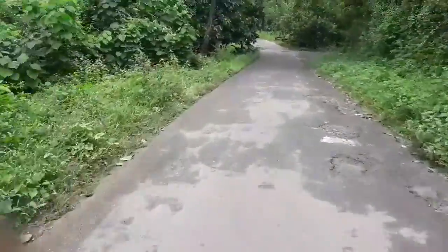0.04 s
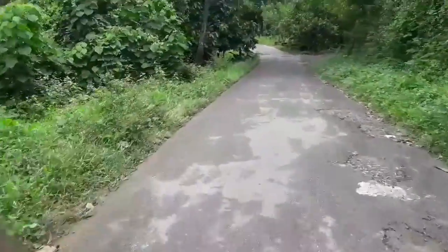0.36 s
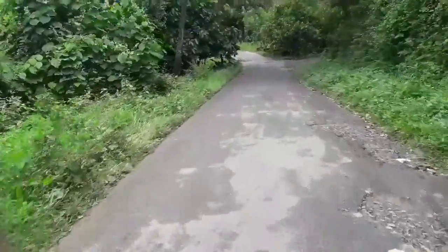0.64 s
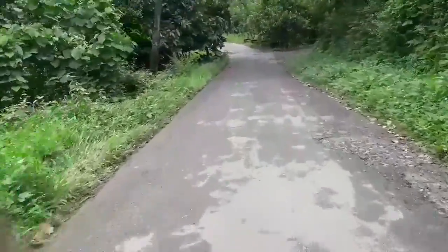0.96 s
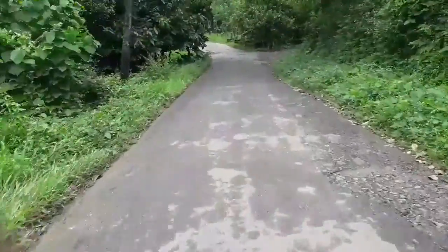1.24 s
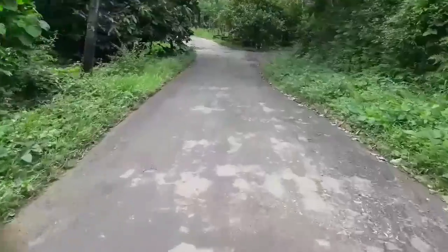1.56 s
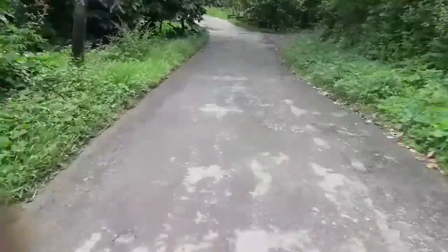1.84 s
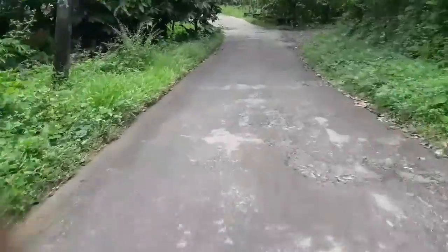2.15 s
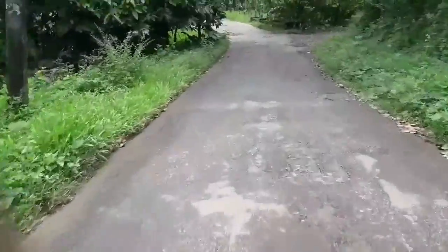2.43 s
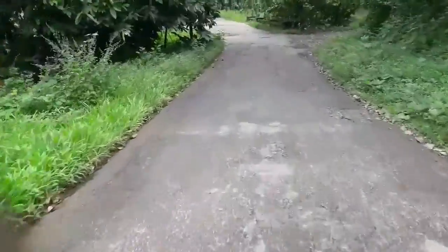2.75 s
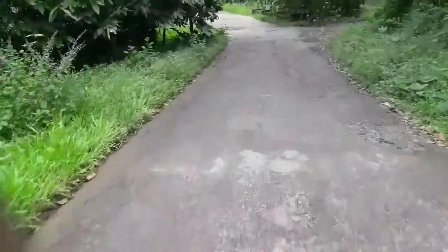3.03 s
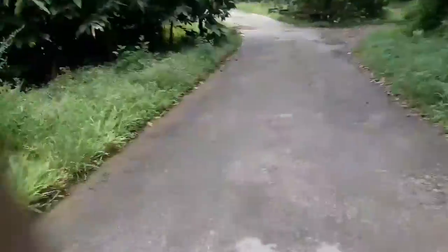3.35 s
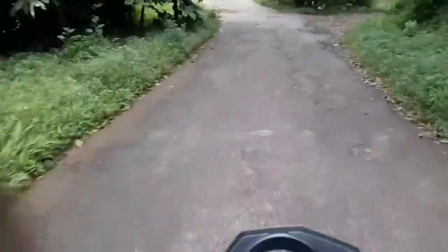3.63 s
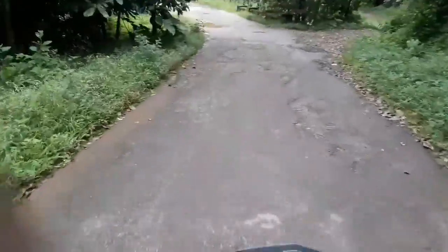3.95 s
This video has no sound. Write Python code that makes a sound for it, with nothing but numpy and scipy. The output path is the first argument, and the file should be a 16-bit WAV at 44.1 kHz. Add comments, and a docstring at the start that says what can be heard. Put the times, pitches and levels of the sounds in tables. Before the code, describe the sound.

A motorcycle putters steadily at low revs, close to a microphone riding with it, while a louder, wavering brake squeal keeps coming and going. Tyres rush softly on the country road until a rough patch brings rattles and one knock.

```python
"""Motorcycle on a country road, from the saddle.

A small microphone rides along on a single-cylinder machine at low revs. Close by, each firing rings
the exhaust pipe, about twelve thumps a second, over clacking valve gear and tyre noise. A dragging
brake squeals on and off. Near the end a rough patch makes the bodywork rattle and knock."""
import sys
import numpy as np
from scipy import signal
from scipy.fft import rfft, irfft
from scipy.io import wavfile
from scipy.ndimage import uniform_filter1d, map_coordinates

SR = 44100
rng = np.random.default_rng(int(sys.argv[2]) if len(sys.argv) > 2 else 0)


def bounce(signal):
    """Save signal as a 16-bit WAV file at the path given by the first command-line argument."""
    frames = np.transpose(np.atleast_2d(signal))
    limited = np.clip(frames, -1, 1)
    pcm = np.round(limited * 32767).astype(np.int16)
    wavfile.write(sys.argv[1], SR, pcm)


N = 176400

# Engine speed: t/s, firing rate/Hz
FIRING_RATE = [(0, 12.64), (.6, 12.114), (.9, 12.815), (1.2, 12.21), (1.5, 13.179), (1.8, 12.939),
               (2.5, 12.436), (3.2, 12.146), (4, 11.652)]


def amp(db):
    """Decibels to gain."""
    return 10 ** (np.asarray(db) / 20)


def unit(x):
    """Scales to rms 1."""
    return x / np.sqrt(np.mean(abs(x) ** 2) + 1e-20)


def curve(rows):
    """Joins (t/s, value) points with straight lines, at every sample."""
    times, values = np.transpose(rows)
    return np.interp(np.arange(N) / SR, times, values)


def add(mix, start_s, sound):
    """Mixes a sound in at the given time."""
    part = mix[max(round(start_s * SR), 0):][:len(sound)]
    part += sound[:len(part)]


def coloured(spectrum):
    """Noise of rms 1, shaped by (f/Hz, level/dB) points of spectral density."""
    hz, db = np.transpose(spectrum)
    gain = amp(np.interp(np.log(np.fft.rfftfreq(N, 1 / SR) + 1), np.log(hz), db))
    return unit(irfft(rfft(rng.standard_normal(N)) * gain, N))


def drift(rate_hz):
    """Random motion of rms 1, up to about the given rate."""
    hz = np.fft.rfftfreq(N, 1 / SR)
    return unit(irfft(rfft(rng.standard_normal(N)) / (1 + (hz / rate_hz) ** 4), N))


def noise_band(phase, width_hz):
    """A narrow band of noise that follows the phase of a tone."""
    return unit(drift(width_hz / 2) * np.cos(phase) + drift(width_hz / 2) * np.sin(phase))


def engine_cycles(first_firing_s=0.01116):
    """Number of engine cycles since the first firing."""
    return np.cumsum(curve(FIRING_RATE)) / SR - first_firing_s * FIRING_RATE[0][1]


def exhaust(rms_db=-40.5, rise_s=0.014, spread_db=0.5, detune=0.0086):
    """Each firing rings the low modes of the pipe, never quite alike; a few burn weakly."""
    # Pipe modes: f/Hz, relative level/dB, t60/s
    pipe_modes = [(66.6, -14.5, 0.083), (98, -9, 0.047), (118.5, 6.5, 0.083), (224, -11, 0.063),
                  (331.6, -2.5, 0.058)]
    # Weak burns: t/s, level change/dB
    weak_burns = [(.25, -6), (.82, -7), (2.39, -15), (2.55, -6), (2.79, -5), (2.88, -4.5)]
    out, t = np.zeros(N), np.arange(SR // 5) / SR
    firing_times = np.flatnonzero(np.diff(np.floor(engine_cycles()))) / SR
    for start in firing_times:
        *mode_shifts, softness = rng.standard_normal(len(pipe_modes) + 1)
        weak_db = sum(db for at, db in weak_burns if abs(at - start) < .04)
        ring = sum(amp(db - 60 * t / t60) * np.sin(2 * np.pi * hz * (1 + detune * shift) * t)
                   for (hz, db, t60), shift in zip(pipe_modes, mode_shifts))
        attack = 1 - np.exp(-t / rise_s)
        add(out, start, -ring * attack * amp(weak_db - spread_db * softness))
    return amp(rms_db) * unit(out)


def valve_gear(rise_s=0.004, t60_s=0.099):
    """Below the saddle the valve gear clacks twice a cycle, once softly and once hard."""
    # Clacks: position/share of the cycle, level/dB
    clacks = [(.27, -44), (.79, -38)]
    # Clack spectrum: f/Hz, relative level/dB
    clack_spectrum = [(300, -17), (700, -4), (950, -8), (1200, 2.5), (1700, -13), (2500, -29.5),
                      (8000, -46)]
    envelope = np.zeros(N)
    for share, db in clacks:
        age_s = (engine_cycles() - share) % 1 / curve(FIRING_RATE)
        envelope += np.minimum(age_s / rise_s, 1) * amp(db - 60 * age_s / t60_s)
    return envelope * coloured(clack_spectrum)


def road_wash(patch_db=1.18):
    """Patchy tyre, air and engine noise around the rider, louder on the rough stretch."""
    # Wash spectrum: f/Hz, relative level/dB
    wash_spectrum = [(20, -37), (45, -17), (80, -1), (130, -5.5), (175, -5), (230, 0.5), (320, 0.5),
                     (500, -7), (730, -5), (1150, -7.5), (1700, -17), (2400, -20), (4000, -23.5),
                     (7200, -27.5), (7700, -35.5), (15500, -42.5)]
    # Wash along the road: t/s, level/dB
    wash_level = [(0, -40), (1, -39), (2.9, -38.5), (3.2, -36), (3.45, -37.5), (4, -38)]
    cells = signal.stft(coloured(wash_spectrum), nperseg=512)[2]
    patches = uniform_filter1d(rng.standard_normal(cells.shape), size=7, axis=0)  # across frequency
    patches = unit(uniform_filter1d(patches, size=3, axis=1))  # across time
    wash = signal.istft(cells * amp(patch_db * patches), nperseg=512)[1][:N]
    return amp(curve(wash_level)) * unit(wash)


def brake_squeal(wobble_hz=22.8, flutter_db=2.76, mid_db=-20, brighten_db_per_hz=0.0349, scrape_db=-26.5):
    """A dragging pad sings a wavering tone, purest when loudest, with rasp, overtones and dry scraping."""
    # Squeal pitch: t/s, f/Hz
    squeal_pitch = [(0, 2702), (.15, 2805), (.2, 2640), (.35, 2755), (.44, 2716), (.53, 2840), (.7, 2715),
                    (.74, 2784), (.85, 2752), (.89, 2910), (.94, 2728), (1.08, 2760), (1.15, 2963),
                    (1.24, 2792), (1.32, 2820), (1.45, 2667), (1.54, 2972), (1.6, 2903), (1.67, 3043),
                    (1.695, 3010), (1.71, 2775), (1.75, 2885), (1.94, 2846), (2.04, 3020), (2.13, 2966),
                    (2.33, 2950), (2.58, 2894), (2.66, 3037), (2.75, 2894), (2.85, 2978), (2.89, 2904),
                    (3.0, 3160), (3.05, 2967), (3.24, 2847), (3.3, 2946), (3.46, 3035), (3.62, 3090),
                    (3.68, 2960), (3.74, 3110), (3.8, 3120), (3.83, 3070), (3.89, 3146), (4, 3180)]
    # Squeal swells, in five consecutive stretches: t/s, level/dB
    squeal_swells = [
        [(0.0, -45), (0.02, -64), (0.058, -28.5), (0.112, -42.5), (0.118, -54), (0.158, -54), (0.168, -37.5),
         (0.186, -38.5), (0.208, -53), (0.326, -67), (0.358, -28), (0.382, -47), (0.41, -46), (0.424, -32),
         (0.448, -24), (0.482, -29), (0.51, -39), (0.544, -24.5), (0.61, -26.5), (0.62, -40.5), (0.652, -30.5),
         (0.692, -32.5), (0.722, -46), (0.732, -29), (0.76, -46), (0.77, -34.5), (0.832, -24), (0.878, -32.5),
         (0.954, -29), (0.964, -44), (1.0, -29), (1.022, -41), (1.032, -32), (1.066, -32), (1.1, -51),
         (1.12, -46)],
        [(1.12, -59), (1.13, -59), (1.168, -22), (1.172, -19.5), (1.204, -40), (1.244, -38), (1.262, -62),
         (1.276, -41), (1.296, -62), (1.324, -27), (1.41, -40), (1.43, -30.5), (1.454, -36), (1.468, -27.5),
         (1.512, -25.5), (1.558, -21), (1.576, -26), (1.592, -24.5), (1.606, -18), (1.616, -25), (1.64, -20),
         (1.65, -27.5), (1.66, -24.5), (1.682, -31.5), (1.702, -34), (1.71, -24.5), (1.77, -32.5),
         (1.786, -25.5), (1.798, -27), (1.824, -21), (1.838, -35), (1.856, -31.5), (1.92, -39.5), (1.93, -35),
         (1.94, -45), (1.96, -44)],
        [(1.96, -33.5), (1.992, -35.5), (2.008, -25), (2.034, -33), (2.044, -22.5), (2.064, -32), (2.078, -19),
         (2.134, -26.5), (2.148, -41.5), (2.162, -32), (2.182, -42), (2.188, -45), (2.218, -46.5), (2.224, -46),
         (2.296, -54), (2.302, -44), (2.326, -27), (2.37, -38), (2.38, -30.5), (2.442, -50.5), (2.492, -27.5),
         (2.55, -42), (2.56, -61), (2.572, -34), (2.582, -32), (2.626, -39), (2.648, -24.5), (2.672, -28.5),
         (2.682, -37), (2.714, -43.5), (2.748, -32.5), (2.778, -42), (2.79, -54), (2.81, -58)],
        [(2.81, -52), (2.822, -47), (2.856, -25.5), (2.878, -23.5), (2.928, -43.5), (2.94, -34), (2.966, -42),
         (2.978, -50), (2.992, -48), (3.002, -34), (3.03, -25), (3.066, -42.5), (3.12, -32.5), (3.14, -44),
         (3.16, -34), (3.188, -50), (3.2, -43), (3.218, -53), (3.226, -55), (3.238, -59), (3.272, -40),
         (3.278, -39), (3.292, -27), (3.328, -42), (3.356, -47), (3.376, -64), (3.41, -61)],
        [(3.41, -61), (3.422, -89), (3.458, -26.5), (3.468, -39), (3.5, -42.5), (3.516, -28.5), (3.54, -41.5),
         (3.57, -38), (3.598, -52), (3.616, -24), (3.636, -34), (3.646, -31), (3.66, -33.5), (3.674, -34),
         (3.69, -40), (3.718, -46), (3.726, -35), (3.746, -29), (3.776, -43), (3.83, -19), (3.844, -29.5),
         (3.874, -30.5), (3.882, -40), (3.894, -33.5), (3.97, -55), (3.976, -42), (3.99, -45)],
    ]
    # Rasp against the clean tone, with the squeal at mid_db: t/s, level/dB
    rasp_level = [(0, -13), (1.4, -11.5), (2.2, -8), (3, -1), (4, -5)]
    # Overtones from the second harmonic up: width/Hz, relative level/dB
    overtone_bands = [(300, -20), (520, -33), (1000, -38)]
    # Slow change in overtone strength: t/s, level/dB
    overtone_level = [(0, -1.5), (1, -3), (1.6, 0.5), (2.1, 2.5), (2.7, 0), (4, -1)]
    # Dry scraping of the pad: f/Hz, relative level/dB
    scrape_spectrum = [(500, -30), (2200, -3), (5000, -7), (8000, -16), (15000, -6)]
    pitch_hz = curve(squeal_pitch)
    level = amp(curve(np.concatenate(squeal_swells)))
    phase = 2 * np.pi * np.cumsum(pitch_hz + wobble_hz * drift(rate_hz=117.9)) / SR
    impurity = (level / amp(mid_db)) ** -0.16  # rasp and overtones swell less than the tone
    rasp = amp(curve(rasp_level)) * impurity
    clean = unit(np.sin(phase) * amp(flutter_db * drift(rate_hz=132)))
    tone = (clean + rasp * noise_band(phase, width_hz=282)) / np.sqrt(1 + rasp ** 2)
    overtones = sum(amp(db) * noise_band(k * phase, width)
                    for k, (width, db) in enumerate(overtone_bands, 2))
    # Pressing harder lifts the pitch above its slow trend and brings out the overtones.
    lift_hz = pitch_hz - uniform_filter1d(pitch_hz, round(5.2 * SR))
    brightness = amp(curve(overtone_level) + brighten_db_per_hz * lift_hz) * impurity
    scrape = amp(scrape_db) * coloured(scrape_spectrum)
    return level * (tone + brightness * overtones + scrape)


def impact(spectrum, db, t60_s, rise_s):
    """The dense ring of many struck parts, as a quickly dying burst of noise."""
    t = np.arange(SR // 4) / SR
    return coloured(spectrum)[:len(t)] * amp(db - 60 * t / t60_s) * np.minimum(t / rise_s, 1)


def rough_patch(knock_at_s=3.351):
    """Rough road rattles loose parts, and the suspension knocks once."""
    # Loose parts striking: t/s, level/dB, t60/s
    rattles = [(3.073, -29, .03), (3.092, -30.5, 0.03), (3.116, -22.5, 0.03), (3.219, -31.5, .08),
               (3.252, -30, 0.051), (3.268, -23.5, 0.078), (3.356, -36, 0.16), (3.414, -33, .04),
               (3.432, -33, 0.14), (3.478, -32, .03)]
    # Rattle spectrum: f/Hz, relative level/dB
    rattle_spectrum = [(200, -3), (900, -9.5), (1480, -0.5), (1850, -9.5), (2450, -0.5), (3500, -11),
                       (6800, -13), (8000, -26.5), (15000, -38)]
    # Suspension knock spectrum: f/Hz, relative level/dB
    knock_spectrum = [(100, -29), (280, -10), (410, 7.5), (600, -4.5), (820, 3.5), (1300, -22), (2500, -27),
                      (8000, -46)]
    out = np.zeros(N)
    for start, db, t60_s in rattles:
        add(out, start, impact(rattle_spectrum, db, t60_s, rise_s=0.0017))
    add(out, knock_at_s, impact(knock_spectrum, db=-19, t60_s=0.054, rise_s=0.0032))
    return out


def scene():
    """Everything as it reaches the saddle, in mono."""
    return (exhaust() + valve_gear() + road_wash() + brake_squeal() + rough_patch())[None]


def record(dry, low_cut_hz=44, slip_hz=3889.8, slip_samples=0.88, high_cut_hz=15850):
    """A small microphone drops the deepest bass; the recorder adds timing slip and cuts the top treble."""
    low_cut = signal.butter(4, low_cut_hz, "high", fs=SR, output="sos")
    heard = signal.sosfilt(low_cut, dry[0])
    # The timing slips in a fast sawtooth, giving the squeal thin sidebands.
    n = np.arange(N)
    sawtooth = n * slip_hz / SR % 1 - .5
    slipped = map_coordinates(heard, [n + slip_samples * sawtooth], order=3, mode="nearest")
    high_cut = signal.firwin(511, high_cut_hz, window=("kaiser", 9), fs=SR)
    return signal.oaconvolve(slipped, high_cut, "same")[None]


dry = scene()
out = record(dry)
bounce(out)
```